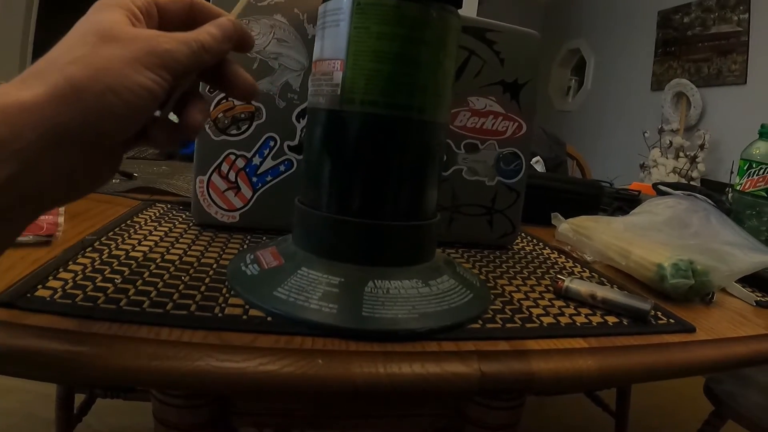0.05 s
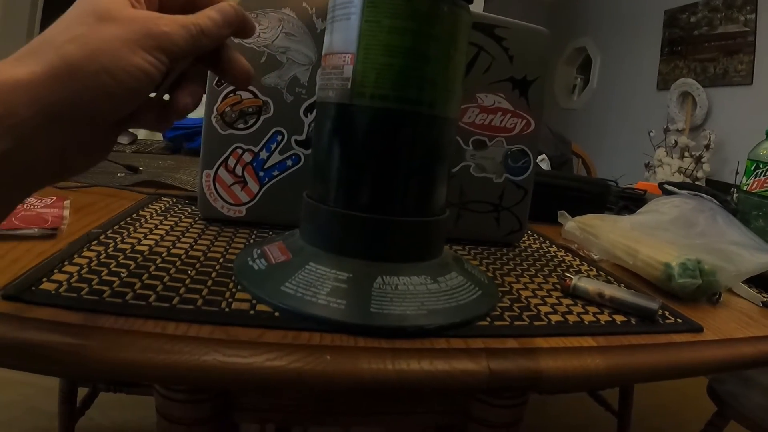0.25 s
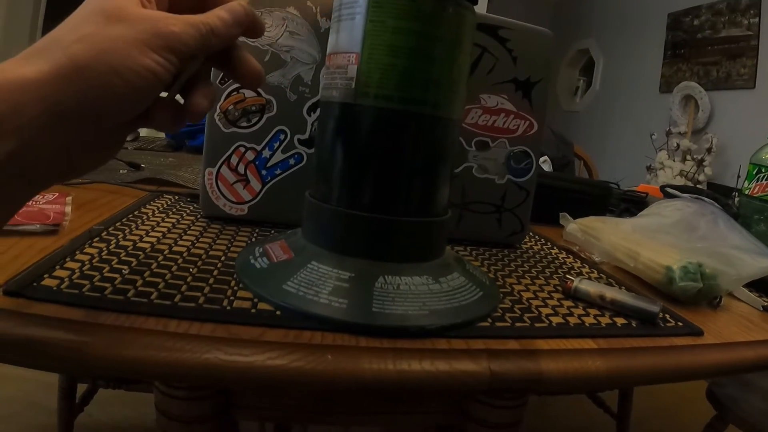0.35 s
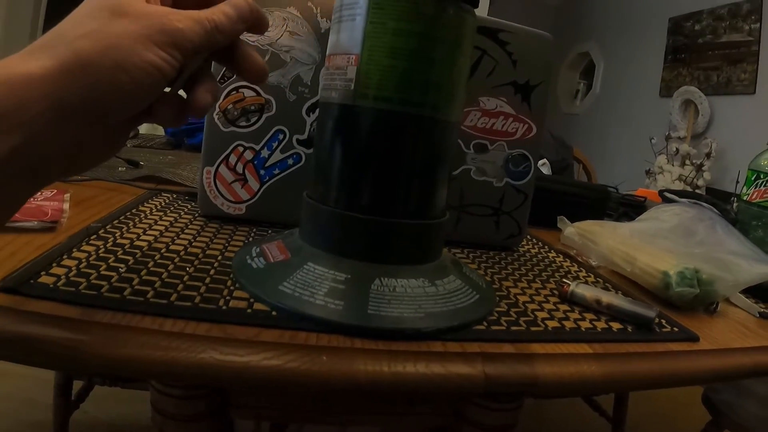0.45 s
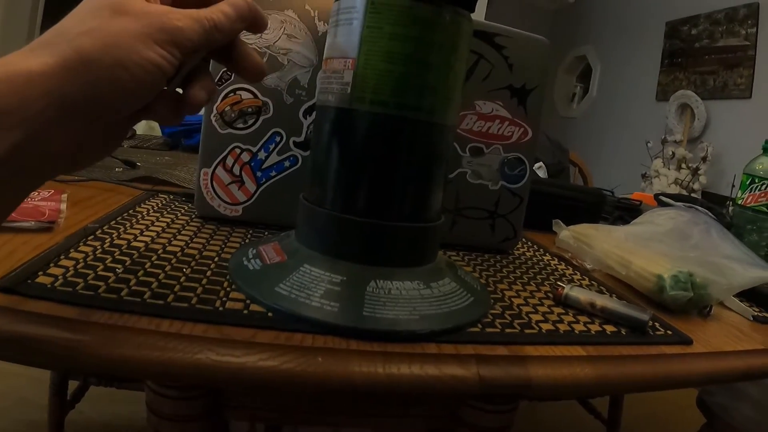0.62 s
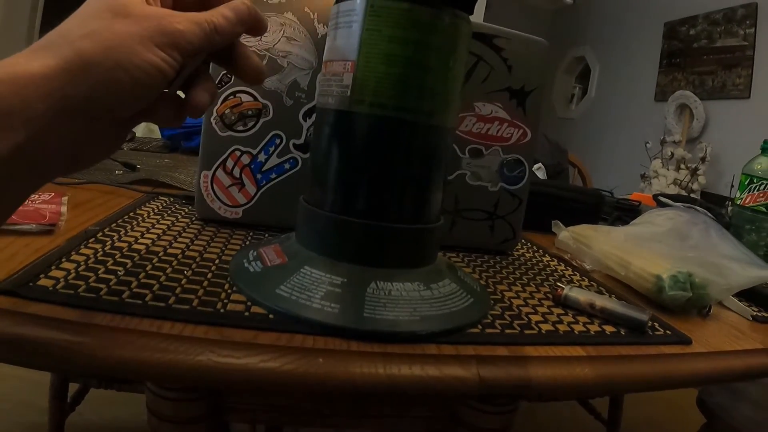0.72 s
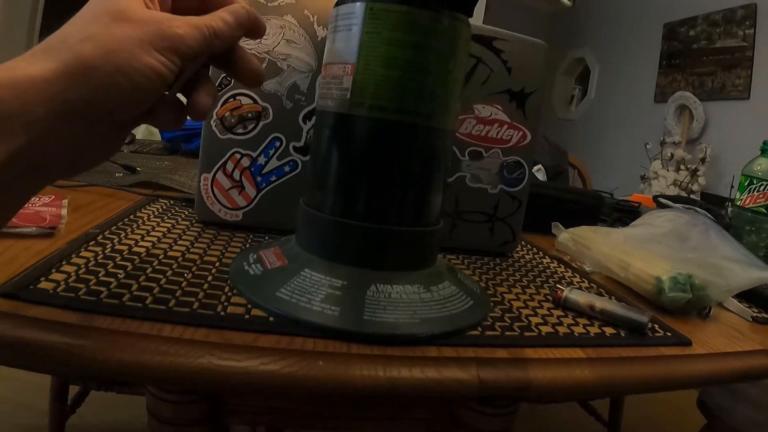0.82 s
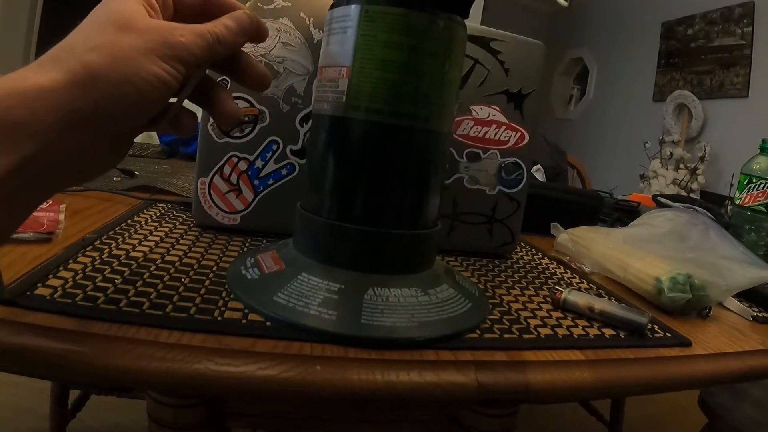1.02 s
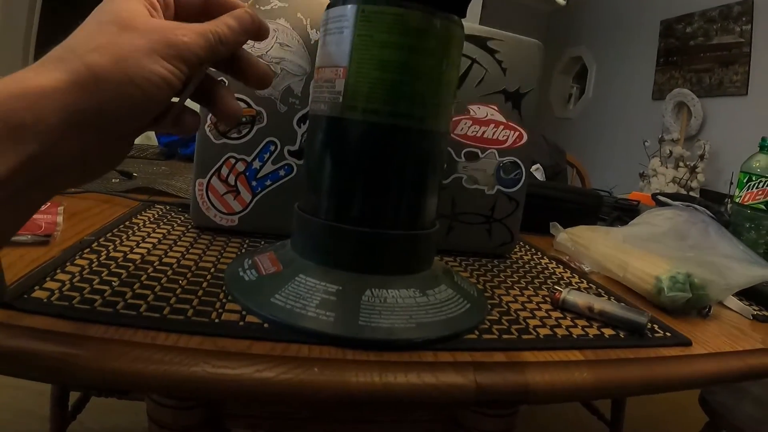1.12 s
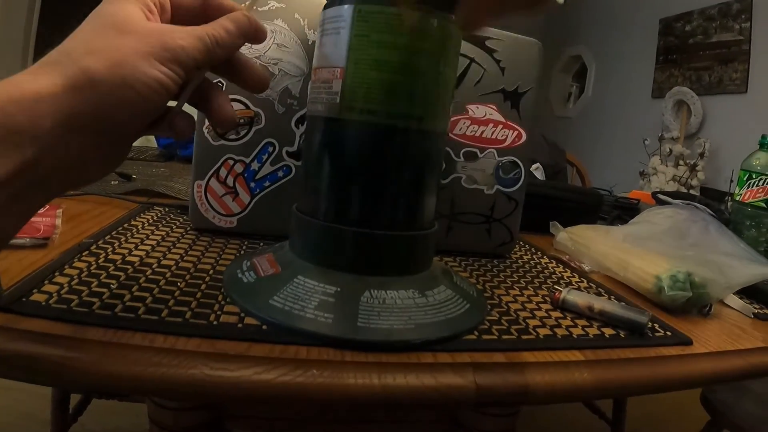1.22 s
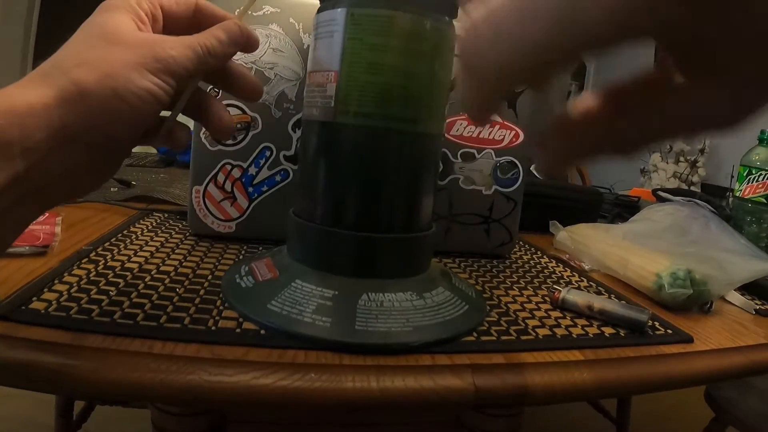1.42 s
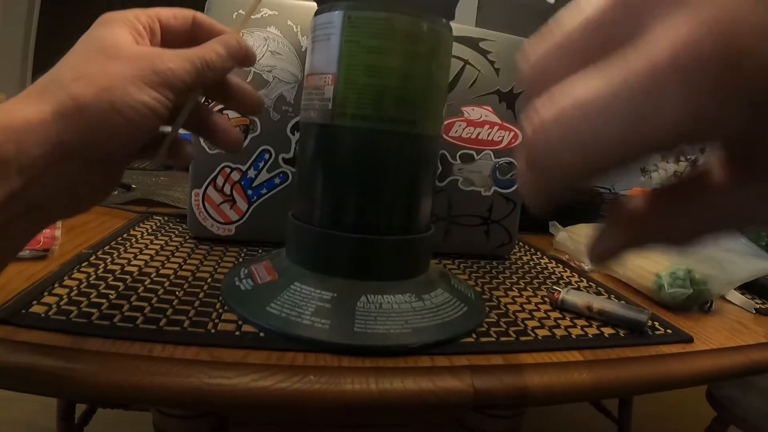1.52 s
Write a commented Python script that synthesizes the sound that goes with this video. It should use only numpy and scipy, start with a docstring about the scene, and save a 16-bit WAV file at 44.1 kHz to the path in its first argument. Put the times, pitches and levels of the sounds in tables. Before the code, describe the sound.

A propane lantern gives two sharp metallic clicks, and with the second a steady gas hiss begins. Handling adds small ticks and dull knocks of its plastic base on a wooden table, close by in a small room.

```python
"""Two sharp metallic clicks, then a steady hiss of gas: a propane lantern, close by in a small room.
The clicks ring its metal body; with the second the gas starts and hisses on through the resonances
of the burner tube. Handling adds small ticks and finger brushes, and knocks the plastic base
against a wooden table."""
import sys
import numpy as np
from scipy import signal
from scipy.fft import rfft, irfft
from scipy.io import wavfile

SR = 44100
rng = np.random.default_rng(int(sys.argv[2]) if len(sys.argv) > 2 else 0)


def store_wav(level_fs):
    """Save 16-bit WAV to argv[1]."""
    pcm = np.round(np.clip(np.atleast_2d(level_fs), -1, 1) * 32767)
    wavfile.write(sys.argv[1], SR, pcm.T.astype(np.int16))


N = 68355
HIT_N = 16384  # samples in one blow's decay
TIME_S, AGE_S = np.arange(N) / SR, np.arange(HIT_N) / SR
TOP_HZ = 15500


def clicks():
    """Each click snaps, rings the valve parts and the metal body, and dies away in the room."""
    # Clicks and ticks. Each row: start in seconds, snap in dB, brightness in Hz, valve ring in dB,
    # body ring in dB, room in dB, weight from 0 (light tick) to 1 (heavy clack).
    hits = [(0.0579, -47, 7000, -60, -50.5, -66, 0), (0.235, -26.5, 8550, -54, -73, -66, 0.22),
            (0.2378, -25, 11400, -20, -33.5, -35.5, 0), (.2445, -35, 12000, -38, -73, -55, 0.51),
            (0.287, -48, 13300, -54, -55, -59, 0.19), (0.3793, -19.5, 6800, -31, -27, -50, 1),
            (.3814, -16.5, 6200, -11, -54, -27.5, 0.85), (.3845, -24, 5300, -22, -17.5, -31, 0.96),
            (.4125, -31.5, 5560, -48, -35, -54, 0.46), (0.4442, -32, 5840, -44, -38, -34.5, 0.18),
            (.5538, -26.5, 4900, -35, -23.5, -41.5, 0.67), (1.153, -42.5, 5500, -64, -52.5, -60, 0.3)]
    # Body modes. Each row: frequency in Hz, dB in a light tick, dB in a heavy clack, t60 in seconds.
    body_modes = [(246, -2.5, -15, 0.16), (382, -20, -7.5, 0.25), (461, 0, -6.5, 0.21),
                  (499, -15.5, -8.5, 0.32), (557, -5, -9, 0.29), (611.7, 1, 0.5, 0.22), (630, 1.5, -7, 0.1),
                  (884, -28, -12.5, 0.36), (970, -48, -24, .16), (1167, -7, -6, 0.11),
                  (1364, -16.5, -47, 0.65), (1633, -30, -14, 0.32), (1742, -33, -9.5, 0.19),
                  (1836, -34, -13, 0.2), (2177, -13, -30, 0.1), (5200, -20, -26, 0.1),
                  (6400, -21, -45, 0.23)]
    # Modes of the valve's small metal parts. Columns as for the body.
    valve_modes = [(976, -15, -7.5, 0.063), (2144, -9.5, -6.5, 0.055), (2220, -16, -8, 0.044),
                   (2210, -26, -22, 0.084), (3342, -13.5, -15.5, 0.047), (3517, -29, -11, 0.055),
                   (4696, -11, -8, 0.038), (5145, -2.5, -7, 0.022), (6660, -15, -16.5, 0.054),
                   (7000, -25, -2.5, 0.024), (9330, -6, -15, 0.017), (9880, -5.5, -24, 0.018)]
    # Metal-on-metal snap spectrum. Each row: frequency in Hz, density in dB.
    snap_colour = [(110, -31), (220, -10.5), (480, 9), (1000, 1.5), (1400, -11.5), (1800, 10),
                   (2170, -12.5), (2800, -3.5), (3450, -1.5), (4000, 1), (5200, -0.5), (7300, -1),
                   (8600, -8.5), (10200, -12.5), (11200, -14.5), (15000, -15)]
    # Reverberation spectrum. Each row: frequency in Hz, density in dB.
    room_colour = [(100, -64), (220, 9), (350, 5), (550, 9.5), (1000, 0), (1400, 0.5), (2200, 1.5),
                   (2800, -8), (5200, -5), (6600, -20), (8000, -21.5), (12500, -36), (15000, -52)]
    out = np.zeros((2, N))
    for start_s, snap_db, bright_hz, valve_db, body_db, room_db, weight in hits:
        burst = noise(np.ones_like(freqs(HIT_N)), size=HIT_N) * fade(rise_s=0.00063, t60_s=0.031)
        snap = irfft(rfft(burst) * contact(snap_colour, bright_hz))
        room = noise(gains(room_colour, HIT_N), size=HIT_N) * fade(rise_s=0.0019, t60_s=0.26)
        valve = ring(struck(valve_modes, weight), rise_s=0.0003, bright_hz=bright_hz)
        body = ring(struck(body_modes, weight), rise_s=0.0034)
        metal = undb(valve_db) * valve + undb(body_db) * body
        add(out, start_s, undb(snap_db) * snap + metal + undb(room_db) * room)
    return out


def gas(on_s=0.349, jet_db=-51.5, flutter_db=0.97):
    """The jet rushes and blows the tube's resonances, brightening as the pressure builds."""
    # Burner tube resonances. Each row: frequency in Hz, width in Hz, level in dB.
    tube_modes = [(635, 93, -47.5), (767, 110, -49), (1098.3, 132, -41), (1217, 25, -53.5),
                  (1745, 164, -59.5), (2290, 123, -58), (3368, 188, -53.5), (3960, 200, -64),
                  (4320, 300, -66.5), (5216, 92, -64), (5580, 160, -64.5), (7450, 1200, -70.5),
                  (9500, 630, -74)]
    # Swell of the tube's tones as the flow wavers. Each row: time in seconds, gain in dB.
    swell = [(.45, -0.5), (.56, 2.5), (.63, -1.5), (.69, 2.5), (.76, 1), (.85, 1), (.94, 0.5), (1.2, 0),
             (1.53, .5)]
    # Jet spectrum. Each row: frequency in Hz, density in dB.
    jet_colour = [(70, -25), (130, 0), (260, 2), (400, -5.5), (900, -8.5), (1450, -11.5), (2700, -14),
                  (4500, -15), (6100, -16.5), (6900, -31.5), (10500, -30), (12200, -32), (14200, -42),
                  (15500, -62)]
    f = freqs(N)
    peaks = [undb(db) * unit(1 / (1 + ((f - hz ** 2 / f) / width_hz) ** 2))
             for hz, width_hz, db in tube_modes]
    tube_shape = np.sqrt(sum(peak ** 2 for peak in peaks))
    tube_rms = np.sqrt(np.mean(tube_shape ** 2))
    waver_db = np.interp(TIME_S, *np.array(swell).T) + flutter_db * wander(rate_hz=5.8)
    tube = undb(waver_db) * tube_rms * noise(tube_shape)
    hiss = tube + undb(jet_db) * noise(gains(jet_colour))
    low = irfft(rfft(hiss) * dull(f, corner_hz=2720), N)
    treble = hiss - low
    return ramp(on_s, rise_s=0.073) * low + ramp(on_s, rise_s=0.29) * treble


def knocks():
    """The plastic base rocks: each push and release thuds, rings the table top and rattles the base."""
    # Knocks. Each row: start in seconds, thud peak in dB, brightness in Hz, table in dB, base in dB.
    hits = [(0.069, -57, 500, -71, -56), (0.5438, -30, 340, -54, -50), (0.548, -27.5, 158, -42, -41),
            (0.5546, -22, 950, -63, -18.5), (0.6125, -24, 336, -46, -32), (0.6237, -21, 258, -36.5, -60),
            (.633, -18, 324, -34, -33), (.640, -20.5, 243, -36.5, -40), (0.655, -27, 325, -38, -30),
            (1.043, -29, 448, -60, -53), (1.049, -28, 113, -42, -53), (1.054, -24, 724, -55, -21),
            (1.0585, -26.5, 804, -54, -29), (1.089, -33, 297, -44, -55), (1.368, -48, 130, -49, -57)]
    # Table top modes. Each row: frequency in Hz, level in dB, t60 in seconds.
    table_modes = [(53.4, -31, 0.17), (93.5, -13.5, 0.46), (132.3, -6, 0.39), (175.2, 4, 0.17),
                   (220, -7.5, 0.61), (258, -1, 0.15), (302, -3, 0.16), (335.2, -6, 0.27)]
    # Plastic base modes. Columns as for the table top.
    base_modes = [(316, -6.5, 0.031), (540, 2, 0.029), (683, -16, 0.075), (806, -2.5, 0.037)]
    # Thud spectrum. Each row: frequency in Hz, density in dB.
    thud_colour = [(20, -33), (55, 9), (72, -0.5), (110, 4), (170, 3), (300, 1), (800, 3), (1500, -13)]
    table = ring(table_modes, rise_s=0.0059)
    base = ring(base_modes, rise_s=0.00052)
    out, f = np.zeros((2, N)), freqs(N)
    for start_s, thud_db, bright_hz, table_db, base_db in hits:
        push_release = 1j * gains(thud_colour) * dull(f, bright_hz)  # 90 degrees: a two-sided pulse
        delay = np.exp(-2j * np.pi * f * start_s)
        thud = irfft(push_release * delay, N)
        out += undb(thud_db) * thud / np.abs(thud).max()
        add(out, start_s, undb(table_db) * table + undb(base_db) * base)
    return out


def fingers(roughness_db=3.5):
    """Skin slides unevenly over the lantern."""
    # Finger strokes. Each row: centre in seconds, half-width in seconds, level in dB.
    strokes = [(0.062, 0.015, -57), (0.214, 0.045, -62.5), (0.308, 0.0074, -62)]
    # Friction spectrum. Each row: frequency in Hz, density in dB.
    skin_colour = [(100, -22), (170, 5), (300, -1), (500, 1), (900, 3), (2000, -8), (4000, 3), (7000, -4.5),
                   (9000, -16), (14000, -27)]
    pressure = sum(undb(db) * np.exp(-((TIME_S - centre_s) / half_s) ** 2)
                   for centre_s, half_s, db in strokes)
    return pressure * undb(roughness_db * wander(rate_hz=79)) * noise(gains(skin_colour))


def room_tone(level_db=-52):
    """Faint, steady rumble of the room."""
    # Background spectrum. Each row: frequency in Hz, density in dB.
    colour = [(15, -2), (27, 7), (50, -13.5), (95, -71), (135, -15), (170, -3.5), (260, -14.5), (450, -12),
              (620, -14.5), (900, -25.5), (1300, -23), (2000, -28), (6000, -34.5), (9000, -44.5),
              (14000, -56)]
    return undb(level_db) * noise(gains(colour), side_db=4.5)


def ring(modes, rise_s, bright_hz=TOP_HZ):
    """Decaying modes set off by one blow, with slightly random phases."""
    phases_rad = 0.5 * rng.standard_normal(len(modes))
    return sum(undb(db) * dull(hz, bright_hz) * fade(rise_s, t60_s) * np.sin(2 * np.pi * hz * AGE_S + rad)
               for (hz, db, t60_s), rad in zip(modes, phases_rad))


def struck(modes, weight):
    """A heavier blow shares its energy differently among the same modes."""
    return [(hz, light_db + weight * (heavy_db - light_db), t60_s)
            for hz, light_db, heavy_db, t60_s in modes]


def contact(colour, bright_hz):
    """Minimum-phase spectrum of one contact; softer contacts are duller."""
    magnitude = unit(gains(colour, HIT_N) * dull(freqs(HIT_N), bright_hz))
    cepstrum = irfft(np.log(magnitude + 1e-9))
    causal_fold = 1 + np.sign(np.fft.fftfreq(HIT_N))
    return np.exp(rfft(cepstrum * causal_fold))


def noise(shape, side_db=0, size=N):
    """Partly diffuse stereo noise of a given spectrum, rms 1; side_db widens it."""
    # Diffuse share of the sound. Each row: frequency in Hz, side relative to mid in dB.
    diffuse = [(60, -22.5), (250, -16.5), (600, -16), (1100, -14), (2100, -9.5), (3500, -14), (9000, -8.5),
               (13000, -4)]
    mid, side = np.exp(2j * np.pi * rng.random((2, len(shape))))
    spread = undb(side_db) * gains(diffuse, size) * np.array([[1], [-1]])
    return unit(irfft(shape * (mid + spread * side), size))


def wander(rate_hz):
    """Smooth random drift, rms 1."""
    smoothing = np.exp(-(freqs(N) / rate_hz) ** 2)
    return unit(irfft(rfft(rng.standard_normal(N)) * smoothing, N))


def fade(rise_s, t60_s):
    """Quick rise, exponential decay."""
    return (1 - np.exp(-AGE_S / rise_s)) * np.exp(-np.log(1000) * AGE_S / t60_s)


def ramp(start_s, rise_s):
    return np.clip((TIME_S - start_s) / rise_s, 0, 1)


def dull(hz, corner_hz):
    """Third-order low-pass gain."""
    return 1 / np.sqrt(1 + (hz / corner_hz) ** 6)


def gains(points, size=N):
    """Gain per FFT bin from (Hz, dB) points."""
    hz, db = np.array(points).T
    return undb(np.interp(np.log(freqs(size)), np.log(hz), db))


def freqs(size):
    return np.maximum(np.fft.rfftfreq(size, 1 / SR), 1)


def undb(db):
    return 10 ** (np.asarray(db) / 20)


def unit(x):
    return x / np.sqrt(np.mean(x ** 2))


def add(out, start_s, sound):
    span = out[:, int(start_s * SR):][:, :HIT_N]
    span += sound[..., :span.shape[1]]


def scene():
    """The lantern reaches left and right with slightly different level and phase, over the quiet room."""
    # Stereo balance. Each row: frequency in Hz, left minus right in dB.
    balance = [(200, 0.5), (650, 2), (900, 1), (1150, -3.5), (1750, 2.5), (2120, -14.5), (2350, 5.5),
               (2700, -2), (3400, 0), (9000, 0.5)]
    peak_lead_rad, lead_hz = 0.59, 1600  # left ahead of right
    lantern = rfft(clicks() + knocks() + fingers() + gas())
    f = freqs(N)
    lead_rad = peak_lead_rad * (2 * f * lead_hz / (f ** 2 + lead_hz ** 2)) ** 2
    left = np.sqrt(gains(balance)) * np.exp(0.5j * lead_rad)
    right = 1 / left
    return irfft(lantern * np.array([left, right]), N) + room_tone()


def record(dry):
    """Steep low-pass at TOP_HZ."""
    return signal.sosfilt(signal.ellip(8, 0.2, 70, TOP_HZ, fs=SR, output="sos"), dry)


dry = scene()
out = record(dry)
store_wav(out)
```